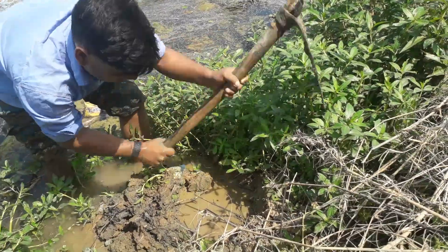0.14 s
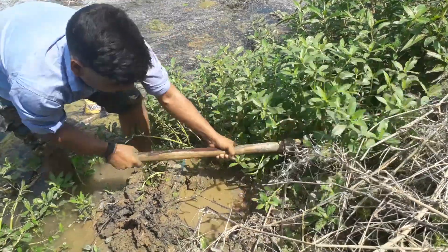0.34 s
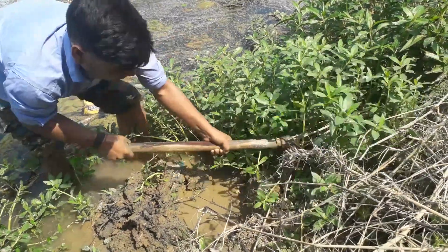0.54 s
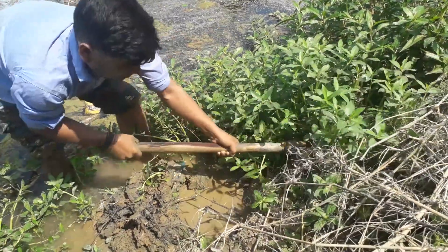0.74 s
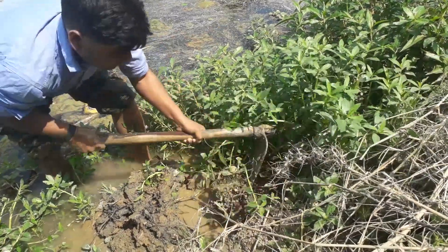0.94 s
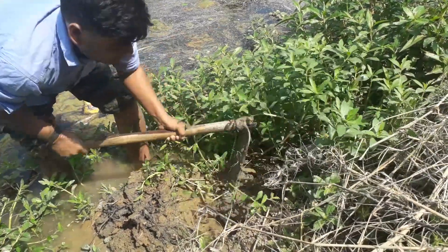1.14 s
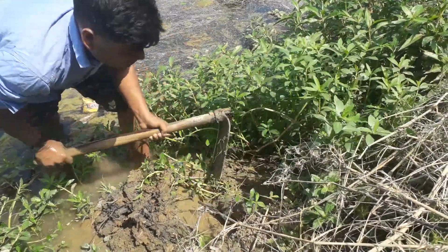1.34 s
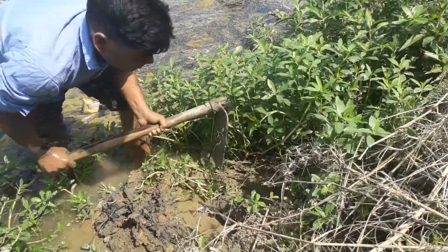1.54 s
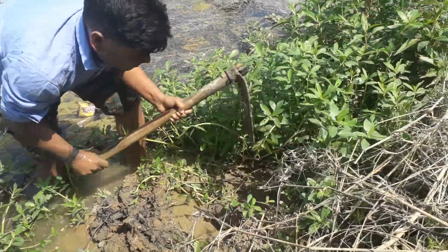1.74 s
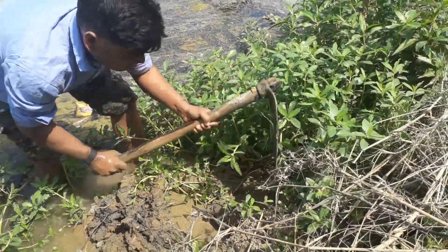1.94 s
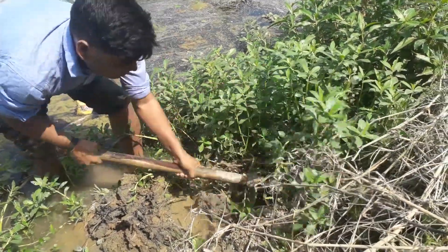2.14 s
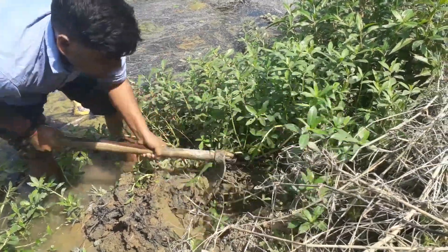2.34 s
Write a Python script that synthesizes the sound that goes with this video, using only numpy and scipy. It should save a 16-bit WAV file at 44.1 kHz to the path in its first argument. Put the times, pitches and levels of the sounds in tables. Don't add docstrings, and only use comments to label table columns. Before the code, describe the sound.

Hoeing a waterlogged bank up close: crisp root-tearing cracks, mud plops and dull blade knocks outdoors

```python
import sys
import numpy as np
from scipy import signal
from scipy.fft import rfft, irfft, next_fast_len
from scipy.io import wavfile
from scipy.ndimage import uniform_filter1d, map_coordinates

SR = 44100
rng = np.random.default_rng(int(sys.argv[2]) if len(sys.argv) > 2 else 0)


def waveform_to_disk(signal):
    frames = np.transpose(np.atleast_2d(signal))
    scaled = np.clip(frames, -1, 1) * 32767
    samples = np.round(scaled).astype(np.int16)
    wavfile.write(sys.argv[1], SR, samples)


def voltage_ratio(decibels):
    exponent = np.asarray(decibels, float) / 20
    return 10 ** exponent


N = 110250


def unit(x):
    return x / np.sqrt(np.mean(x ** 2) + 1e-20)


def along(points, hz):
    f, value = np.transpose(points)
    return np.interp(np.log(hz + 1), np.log(f + 1), value)


def wobble(rate):
    knots = rng.standard_normal(int(N * rate / SR) + 4)
    return map_coordinates(knots, [np.arange(N) * rate / SR])


def filtered(x, response):
    size = next_fast_len(len(x) + 8192)
    spectrum = rfft(x, size) * response(np.fft.rfftfreq(size, 1 / SR))
    return irfft(spectrum, size)[:len(x)]


def resonance(hz, centre, width):
    return 1j * hz * width / (centre * centre - hz * hz + 1j * hz * width)


def patchy(patchy_db):
    z = signal.stft(rng.standard_normal(N), nperseg=256)[2]
    field = uniform_filter1d(rng.standard_normal(z.shape), 5, 0)
    field = unit(uniform_filter1d(field, 5, 1))
    return signal.istft(z * voltage_ratio(patchy_db * field), nperseg=256)[1][:N]


def crackle(spread_db, share, patchy_db):
    when, sign, size = rng.random((5000, 3)).T
    heights = np.sign(sign - .5) * voltage_ratio(-spread_db * np.log(size + 0.003))
    clicks = np.bincount((when * N).astype(int), heights, N)
    return np.sqrt(share) * unit(clicks) + np.sqrt(1 - share) * unit(patchy(patchy_db))


# (time [s], tearing level [dB], mud slosh over it [dB])
EFFORT = [(0.171, -59, -1), (0.221, -36, -26), (0.227, -20.5, -23), (0.256, -22.5, -19), (0.281, -13, -15),
          (0.349, -40, -10), (.8, -55.5, -14.5), (0.889, -37, -15), (1.155, -33.5, -17.5), (1.19, -37, -15),
          (1.36, -41, -13.5), (1.66, -52, -23), (1.922, -59.5, 4.5), (2.058, -40, -23), (2.124, -25, -13),
          (2.219, -40.5, -6), (2.361, -33.5, -9), (2.5, -42.5, -8.5)]
# (frequency [Hz], level [dB])
TEAR = [(880, -20), (2650, -12.5), (3250, -8.5), (4370, -3), (5770, -6), (8830, -4), (9850, -10),
        (13500, -1.5), (16000, -14)]
# (frequency [Hz], level [dB])
SLOSH = [(150, -43), (250, -7), (651, -1), (844, -2.5), (1120, -3.5), (1380, -3), (1540, 0.5), (3000, -6),
         (3900, -8), (6600, -120)]
# (frequency [Hz], width [Hz])
HANDLE = [(680, 70), (1140, 90), (2200, 110)]


def hoe():
    s, level, wet = np.transpose(EFFORT)
    t = np.arange(N) / SR
    level, wet = np.interp(t, s, level), np.interp(t, s, wet)

    calm_db, busy_db = -55, -38
    effort = np.clip((level - calm_db) / (busy_db - calm_db), .15, 1)
    jerks_db = effort * (2.4 * wobble(160) + .5 * wobble(25))

    grit = crackle(spread_db=3.5, share=.4, patchy_db=2.5)
    tear = unit(filtered(grit, lambda hz: voltage_ratio(along(TEAR, hz))))
    ring = voltage_ratio(-30.5) * unit(signal.fftconvolve(grit, blade_ring())[:N])
    fibres = voltage_ratio(-9.5) * fibre_ticks(spread_db=-6.5, hz=6970, cycles=8.1)

    def mud_and_handle(hz):
        hollow = 1 + sum(resonance(hz, centre, width) for centre, width in HANDLE)
        return voltage_ratio(along(SLOSH, hz)) * hollow

    mud = crackle(spread_db=3.0, share=0.64, patchy_db=1.0)
    slosh = voltage_ratio(wet + 0.93 * wobble(40.6)) * unit(filtered(mud, mud_and_handle))
    return voltage_ratio(level + jerks_db) * (tear + fibres + ring + slosh)


def fibre_ticks(spread_db, hz, cycles):
    draw, t = rng.random((1500, 3)), np.arange(96) / SR
    pitch = np.clip(hz * np.exp(1.54 * (draw[:, 1:2] - .5)), 2800, 15000)
    height = voltage_ratio(-spread_db * np.log(draw[:, 2:] + 0.028))
    grain = height * np.exp(-pitch * t / cycles) * np.sin(2 * np.pi * pitch * t)
    at = (draw[:, :1] * N).astype(int) + np.arange(96)
    return unit(np.bincount(at.ravel(), grain.ravel(), N + 96)[:N])


# (frequency [Hz], level [dB], 60 dB decay [s])
BLADE = [(2220, 2, 0.059), (3120, -0.5, 0.059), (3650, -21, 0.27), (5400, -3, 0.057), (6420, 6.5, 0.045),
         (7800, 2, 0.05), (1166, -13, 0.11), (11530, -3, 0.018), (11400, 6.5, 0.0091)]


def blade_ring():
    t = np.arange(SR // 8) / SR
    ring = 0
    for hz, db, t60 in BLADE:
        ring = ring + voltage_ratio(db + rng.normal(0, 1.2) - 60 * t / t60) * np.sin(2 * np.pi * hz * t)
    return ring / abs(ring).max()


# (time [s], peak level [dB], colour [Hz])
SNAPS = [(0.1988, -22, 7240), (0.2242, -5, 6100), (0.2282, -5, 6400), (0.4574, -42, 5070),
         (0.4777, -27, 3870), (0.5029, -19, 4550), (0.5317, -18.5, 3620), (0.5955, -20, 7700),
         (0.6552, -25, 8740), (0.6687, -23.5, 5000), (0.6814, -26, 5200), (0.8851, -3, 3700),
         (0.911, -23, 8500), (0.9348, -16, 6750), (0.972, -22, 4300), (1.0101, -14.5, 9000),
         (1.0419, -16, 4900), (1.056, -8.5, 3720), (1.0772, -15.5, 4000), (1.1161, -9, 6000),
         (1.1386, -19, 4250), (1.163, -11, 9200), (1.1857, -14.5, 9500), (1.2136, -20, 3610),
         (1.2345, -12, 9300), (1.28, -12.5, 11300), (1.3166, -0.5, 4500), (1.3564, -18.5, 4570)]
# (time [s], peak level [dB], colour [Hz])
LATE = [
    (2.1171, -5.5, 5340),
    (2.1664, -13.5, 6750),
    (2.2113, -10.5, 6750),
    (2.2964, -19.5, 4800),
    (2.3456, -10, 5500),
    (2.4514, -18.5, 4270),
    (2.4964, -18.5, 6070),
]
# (time [s], peak level [dB], colour [Hz])
MORE = [(.2692, -14, 4200), (.2755, -10.5, 4400), (.2863, -4.5, 4400), (.2965, -17, 5000),
        (.3085, -26, 5500), (.9415, -18, 4500), (.9935, -26, 5200), (.9991, -22, 4310), (1.0305, -18, 3650),
        (1.0705, -23, 5500), (1.1033, -15, 4410), (1.1305, -14, 6300), (1.1465, -17, 5000),
        (1.1577, -12, 5900), (1.177, -22, 6500), (1.229, -21, 5030), (1.24, -20.5, 6500),
        (2.0707, -17, 3350), (2.1096, -10, 3910), (2.1245, -10, 4270), (2.177, -28, 5200),
        (2.245, -24, 3500), (2.2638, -17.5, 3700), (2.3277, -15, 5160), (2.339, -17, 4200),
        (2.365, -16, 4470), (2.384, -17, 6700)]
# (time [s], peak level [dB])
KNOCKS = [
    (.886, -22),
    (1.119, -21.5),
    (1.319, -10),
    (2.076, -26),
    (2.12, -16),
    (2.214, -25),
]


def snaps():
    out, t = np.zeros(N + SR), np.arange(SR // 8) / SR
    for s, db, hz in list(SNAPS) + list(LATE) + list(MORE):
        t60 = 0.019 * np.exp(0.01 * db)
        swell = (1 - np.exp(-t / 0.00035)) ** 2
        burst = 0.49 * rng.standard_normal(len(t)) * voltage_ratio(-60 * t / t60) * swell
        burst[40] -= 1.86

        def stem(f):
            body = 0.18 / (1 + (900 / (f + 1)) ** 4) / (1 + (f / 3000) ** 4)
            return (voltage_ratio(along(TEAR, f)) + body) * (0.48 + resonance(f, hz, 1200))

        burst = filtered(np.pad(burst, (64, 0)), stem)[64:]
        out[round(s * SR):][:len(t)] += voltage_ratio(db + 0.5) * burst / abs(burst).max()
    for s, db in KNOCKS:
        out[round(s * SR):][:len(t)] += voltage_ratio(db) * blade_ring()
    return out[:N]


# (time [s], peak level [dB], pitch [Hz])
PLOPS = [(0.224, -28.5, 613), (0.274, -15, 596), (0.286, -19, 1100), (0.322, -20.5, 1286), (0.39, -32, 503),
         (0.502, -35.5, 712), (0.68, -36.5, 1320), (0.848, -36, 600), (0.885, -32.5, 548),
         (1.075, -31.5, 1075), (1.124, -31, 730), (1.188, -30, 735), (1.318, -28.5, 1270),
         (2.007, -35, 1386), (2.121, -27.5, 1120), (2.145, -17, 662), (2.216, -27.5, 440), (2.34, -22, 960),
         (2.407, -31, 744), (2.468, -30, 690)]
# (time [s], peak level [dB], pitch [Hz], 60 dB decay [s])
THUD = [(.012, -44, 820, .04), (.272, -30, 160, .12), (.28, -32, 310, .07), (1.219, -26, 3200, .05),
        (1.231, -27, 2880, .04), (1.755, -27, 270, .04), (1.775, -40, 700, .03), (1.745, -42, 1100, .03),
        (1.8, -37, 300, .06), (1.82, -38, 280, .04), (2.082, -30, 3300, .04), (1.32, -35, 600, .06),
        (2.19, -31, 720, .04), (2.205, -30, 680, .05), (2.228, -31, 1200, .05), (2.305, -32, 1150, .04),
        (2.358, -31, 800, .04), (2.448, -33, 1150, .03), (.886, -20, 2050, .015), (1.845, -42, 1600, .015),
        (2.42, -24, 2300, .025), (2.144, -24, 2100, .02), (2.123, -21, 1650, .025), (2.155, -26, 3300, .04),
        (1.098, -30, 2300, .02), (1.104, -30, 1650, .02)]


def plops():
    out, t = np.zeros(N + SR), np.arange(SR // 5) / SR
    pockets = [(s, db, hz, .015 + 18 / hz) for s, db, hz in PLOPS]
    for s, db, hz, t60 in pockets + list(THUD):
        rough = 1 + 0.31 * unit(uniform_filter1d(rng.standard_normal(len(t)), size=60))
        rising = np.sin(2 * np.pi * hz * (t + .03 * t * t / t60))
        tone = rising * rough * voltage_ratio(-60 * t / t60)
        around = lambda f: 1 / (1 + (np.log((f + 1) / (1.07 * hz)) / 0.62) ** 4)
        splat = unit(filtered(rng.standard_normal(len(t)), around)) * voltage_ratio(-6.5 - 60 * t / 0.029)
        onset = 1 - np.exp(-t / 0.0018)
        out[round(s * SR):][:len(t)] += voltage_ratio(db - 2.0) * onset * (tone + splat)
    return out[:N]


# (frequency [Hz], level [dB])
THROAT = [(1500, -34), (1800, -19), (2250, -14), (3200, -3), (4200, 0), (5400, -10), (6300, -24),
          (7000, -11), (10000, -17)]


def chirp(call, low_db):
    t = np.arange(N) / SR
    at, hz, db = np.transpose(call)
    smooth = lambda v, **ends: uniform_filter1d(np.interp(t, at, v, **ends), size=220)
    pitch = smooth(hz) * (1 + 0.008 * wobble(500) + .008 * wobble(120))
    silent = (t < at[0] - .01) | (t > at[-1] + .01)
    gain = smooth(db, left=-61, right=-68) - 60 * silent + 6.0
    phase = 2 * np.pi * np.cumsum(pitch) / SR
    voice = 0
    for k in range(1, 6):
        flutter_db = 2 * np.sqrt(k) * wobble(110)
        if k == 1:
            flutter_db = flutter_db + low_db * np.clip((pitch - 1950) / 250, -2, 1)
        voice = voice + voltage_ratio(gain + along(THROAT, k * pitch) + flutter_db) * np.sin(k * phase)
    rasp_db = -6 + 9 * np.exp(-abs(t - at[1]) / .016)
    breath = lambda f: 1 / (1 + (2800 / (f + 1)) ** 6) / (1 + (f / 9000) ** 4)
    return voice + filtered(voice * voltage_ratio(rasp_db) * rng.standard_normal(N), breath)


# (time [s], pitch [Hz], level [dB])
CHIRP = [
    (1.674, 1300, -56),
    (1.687, 2000, -45),
    (1.697, 2320, -44),
    (1.704, 2300, -45),
    (1.713, 2100, -38),
    (1.735, 2040, -37),
    (1.748, 1810, -39),
    (1.778, 1690, -41),
    (1.792, 1430, -46),
]
# (time [s], pitch [Hz], level [dB])
EARLY = [
    (1.238, 2300, -62),
    (1.244, 2290, -49),
    (1.262, 2230, -44),
    (1.278, 2020, -42),
    (1.29, 1860, -43),
    (1.305, 1740, -43),
    (1.315, 1560, -49),
    (1.32, 1500, -65),
]


def bird():
    out = chirp(CHIRP, low_db=0) + chirp(EARLY, low_db=9)
    t = np.arange(SR // 4) / SR
    tail = rng.standard_normal(len(t)) * voltage_ratio(-60 * t / 0.5)
    return out + voltage_ratio(-15) * signal.fftconvolve(out, tail / np.linalg.norm(tail))[:N]


# (frequency [Hz], level [dB], start [s], end [s])
WHISTLE = (900, -59, 1.84, 2.1)


def far_whistle():
    hz, db, start, end = WHISTLE
    t = np.arange(N) / SR
    fade = np.clip(np.minimum(t - start, end - t) / 0.023, 0, 1)
    return voltage_ratio(db - 4 + 5 * wobble(18)) * fade * np.sin(2 * np.pi * hz * t + 1.2 * wobble(40))


# (frequency [Hz], level [dB], end [s], fade [s])
DRONE = (114, -45, .2, .05)
# (frequency [Hz], level [dB])
RUMBLE = [(18, -72), (30, -54), (65, -3.5), (151, -3), (246, -9), (290, -14), (382, -24.5), (407, -21.5),
          (600, -53), (780, -77), (1320, -120)]
# (frequency [Hz], level [dB])
AIR = [(290, -29), (500, 13), (906, 0), (1060, -30), (1790, -18), (3020, -26), (3150, -28), (16000, 5)]


def outdoors():
    hz, db, end, fade = DRONE
    t = np.arange(N) / SR
    leaving = 1 / (1 + np.exp(np.clip(4 * (t - end) / fade, -30, 30)))
    engine = np.sin(2 * np.pi * hz * t + 0.78 * wobble(21.0))
    drone = voltage_ratio(db + 3.5 + 2.0 * wobble(36)) * engine * leaving
    rumble = unit(filtered(patchy(0.55), lambda f: voltage_ratio(along(RUMBLE, f))))
    air = unit(filtered(patchy(2.1), lambda f: voltage_ratio(along(AIR, f))))
    return drone + voltage_ratio(-49.5 + 0.76 * wobble(3.83)) * rumble + voltage_ratio(-61.5 + 0.63 * wobble(3.3)) * air


def scene():
    return (hoe() + snaps() + plops() + bird() + far_whistle() + outdoors())[None]


def roll_off(x):
    return signal.sosfilt(signal.butter(12, 16980, fs=SR, output="sos"), x)


def record(dry):
    clipped = dry[0] / (1 + abs(dry[0] / .85) ** 4) ** (1 / 4)

    def band(hz):
        treble = np.clip((15900 - hz) / 350, 0, 1) + 0.021 * (hz < 16900)
        return treble / (1 + (62 / (hz + 1)) ** 4)

    return roll_off(filtered(clipped, band)[None])


dry = scene()
out = record(dry)
waveform_to_disk(out)
```